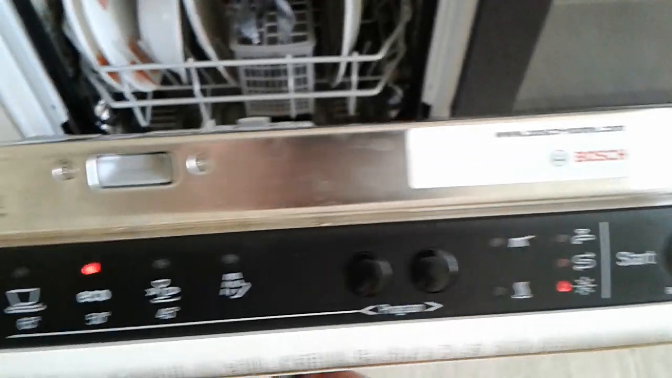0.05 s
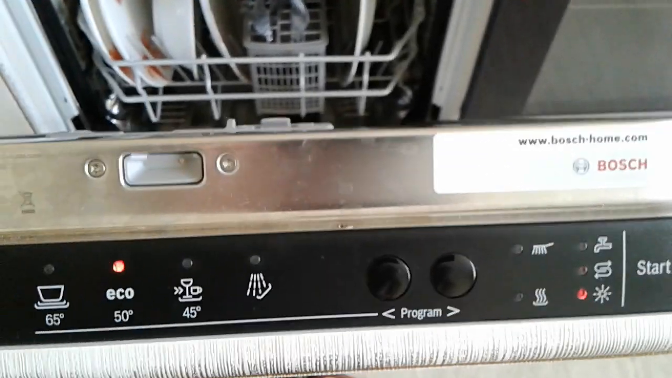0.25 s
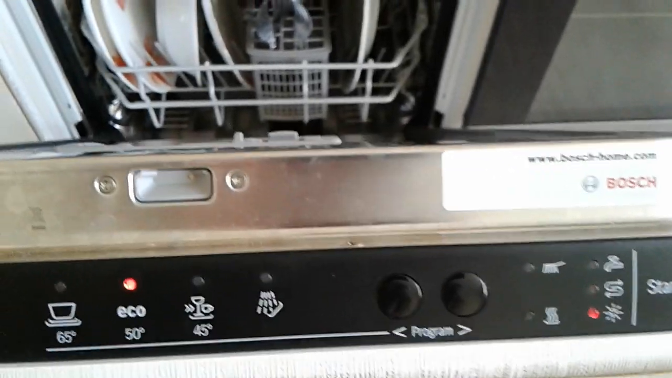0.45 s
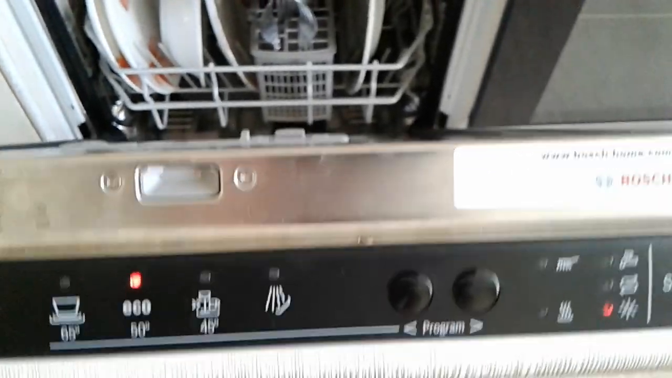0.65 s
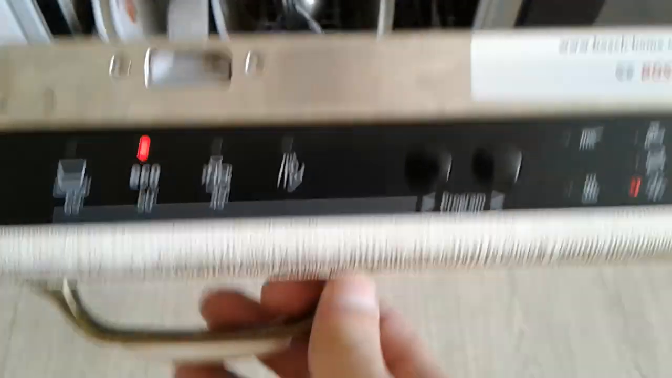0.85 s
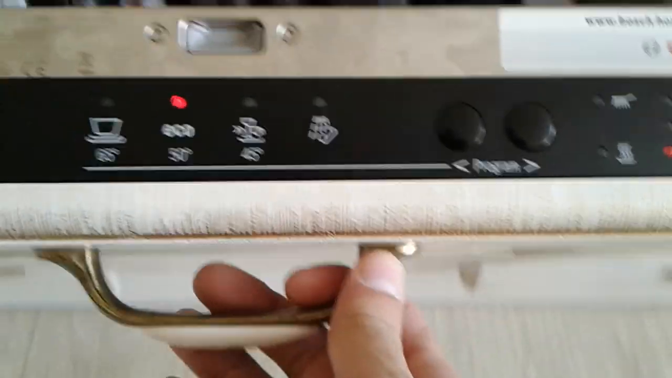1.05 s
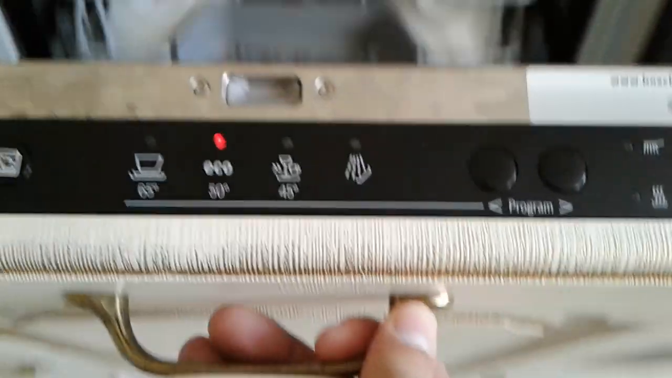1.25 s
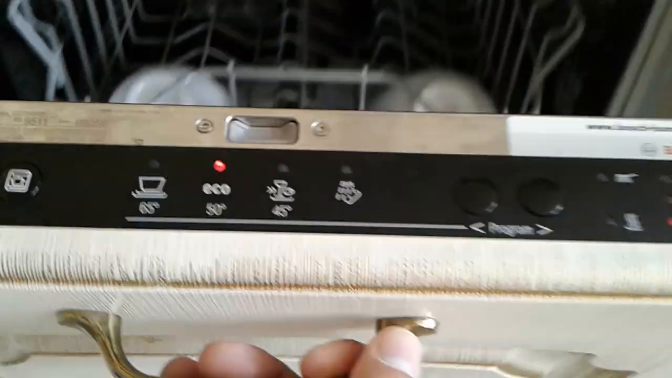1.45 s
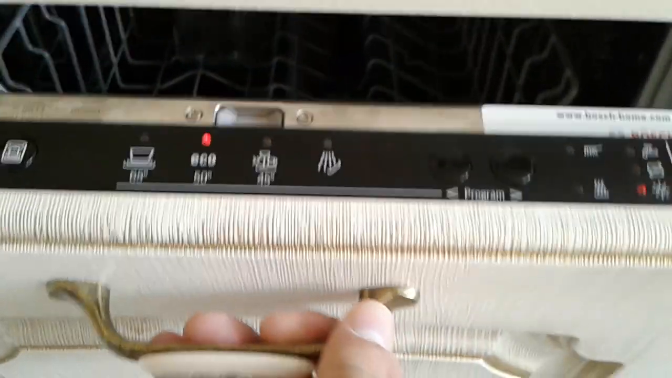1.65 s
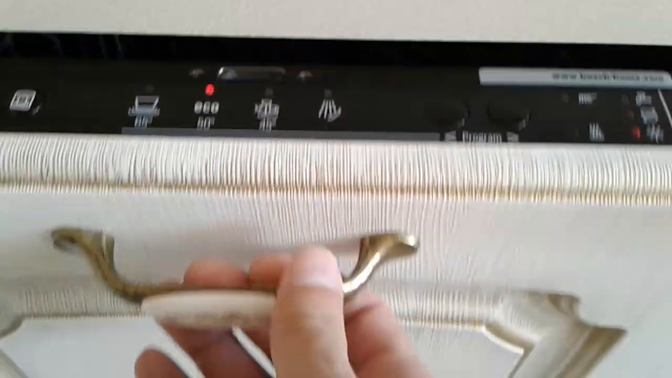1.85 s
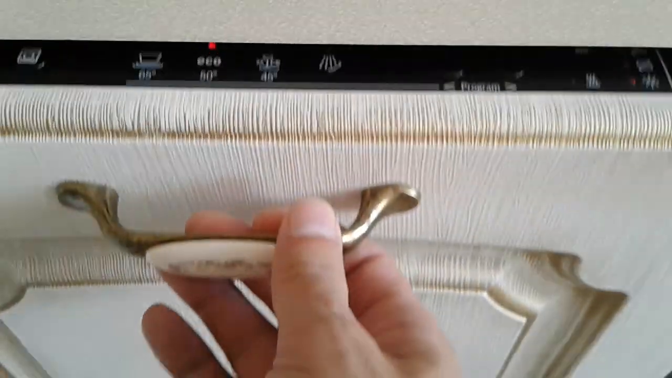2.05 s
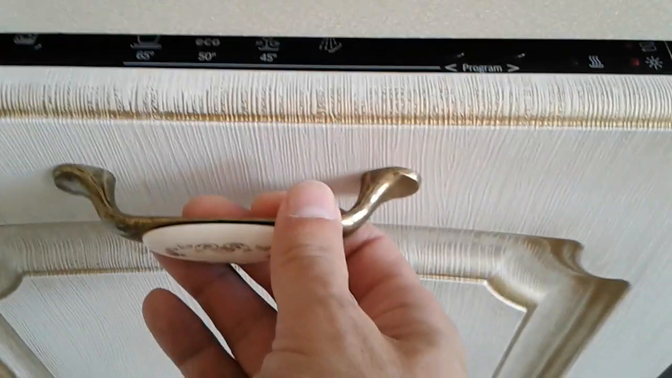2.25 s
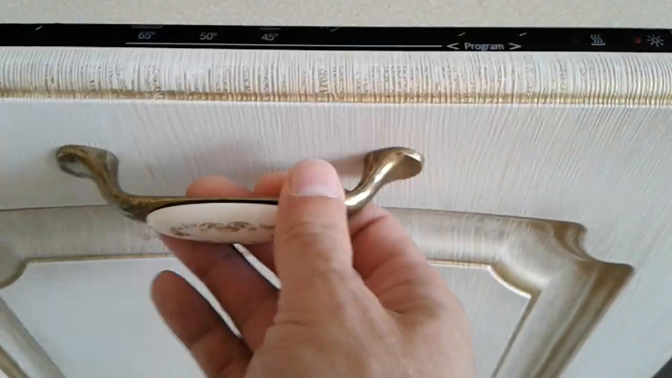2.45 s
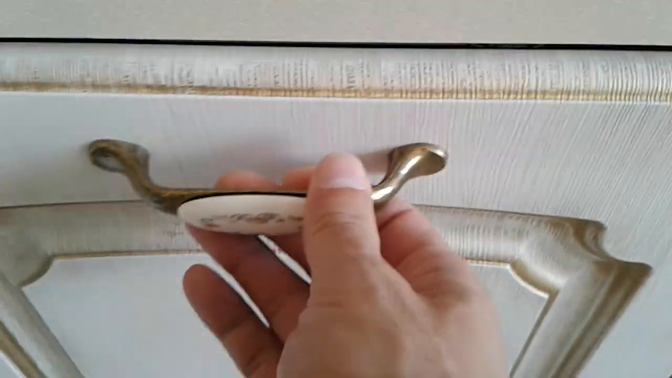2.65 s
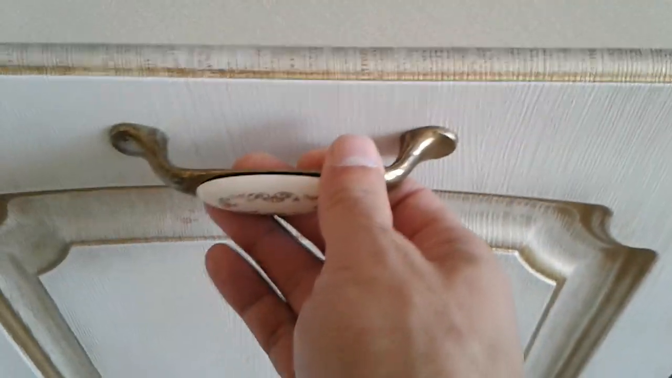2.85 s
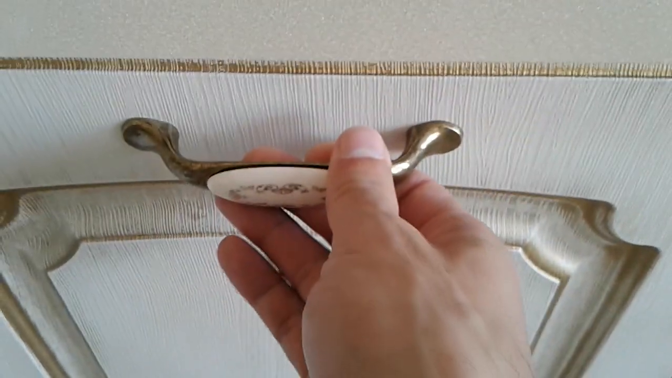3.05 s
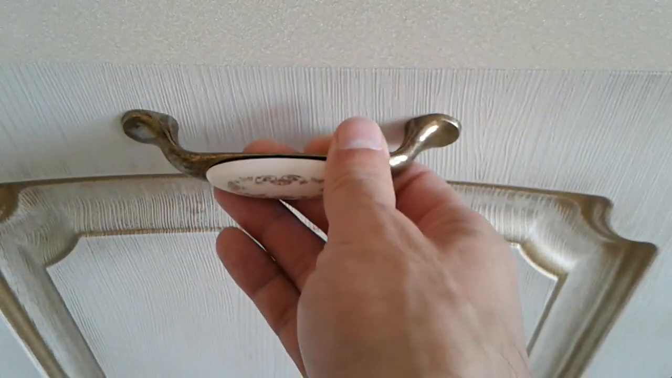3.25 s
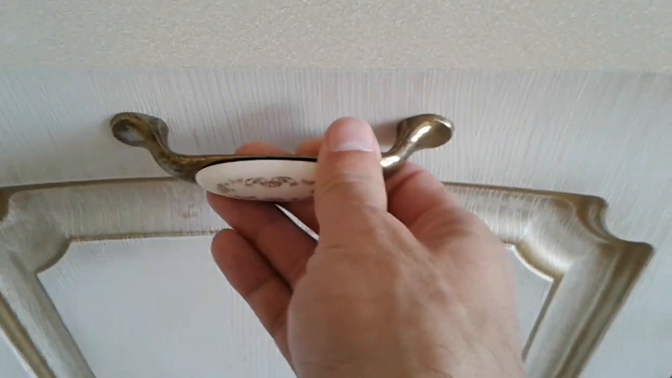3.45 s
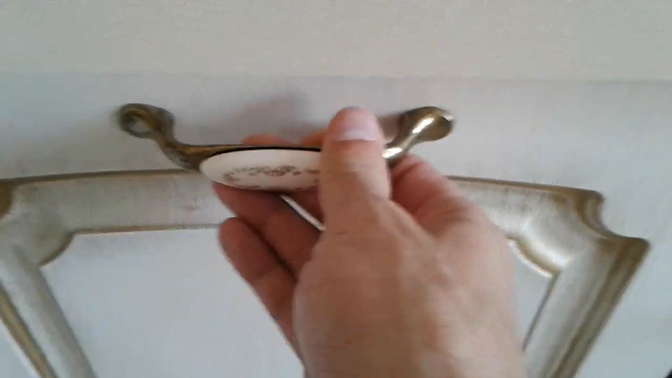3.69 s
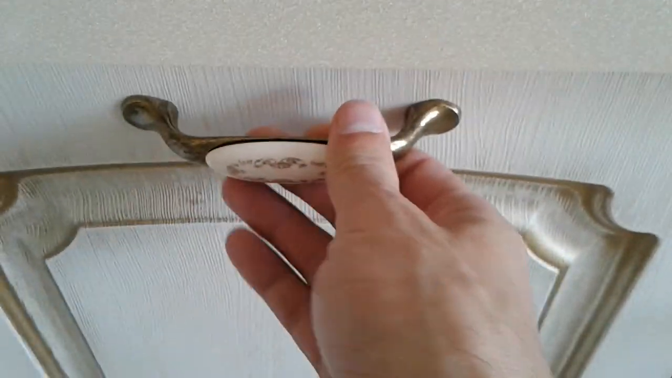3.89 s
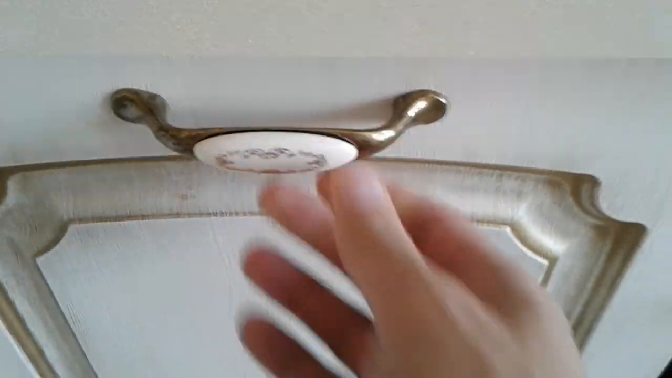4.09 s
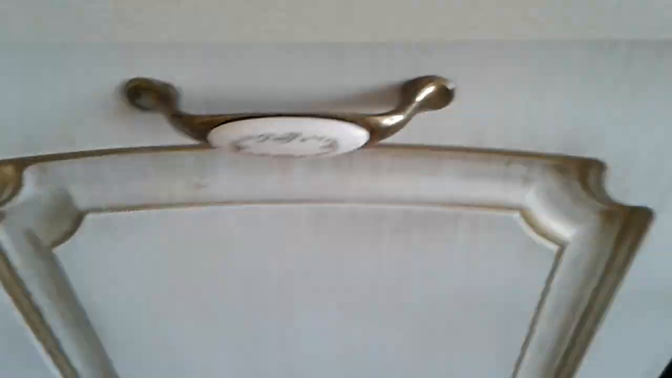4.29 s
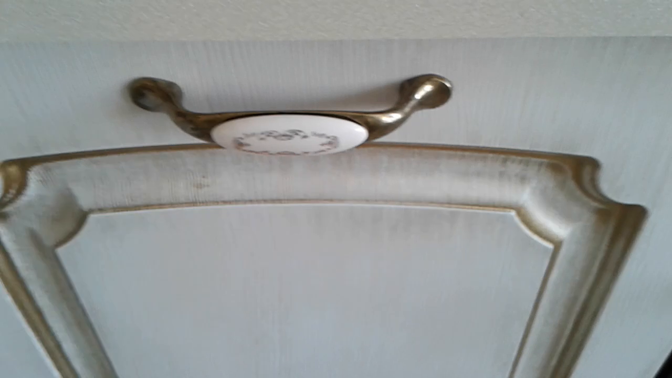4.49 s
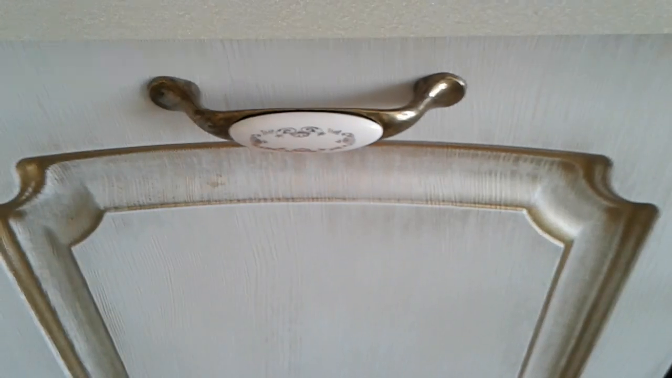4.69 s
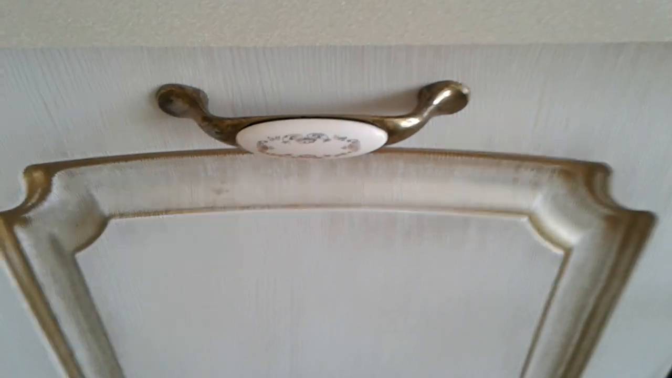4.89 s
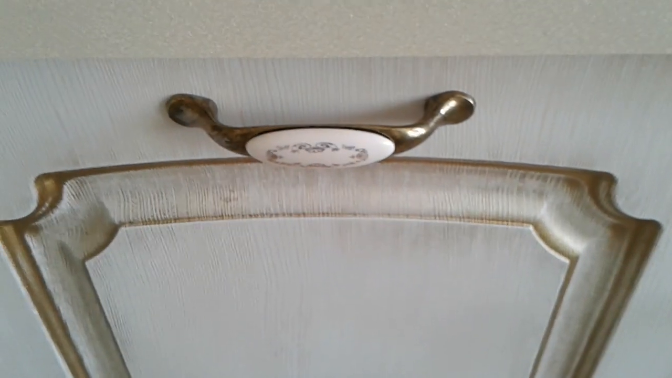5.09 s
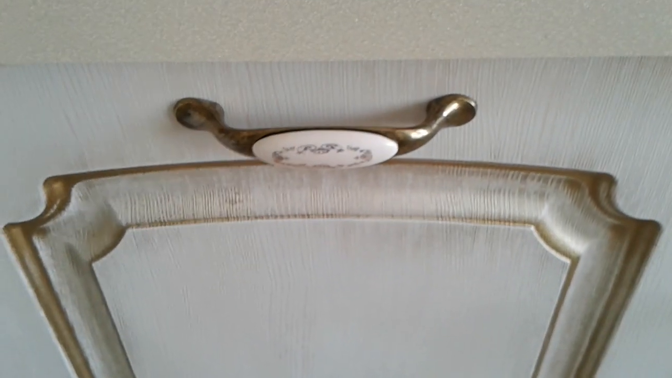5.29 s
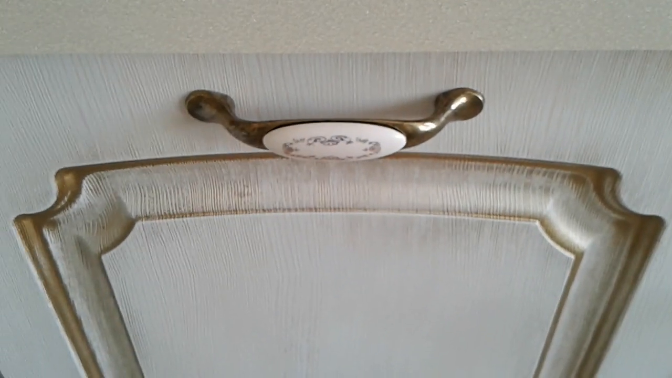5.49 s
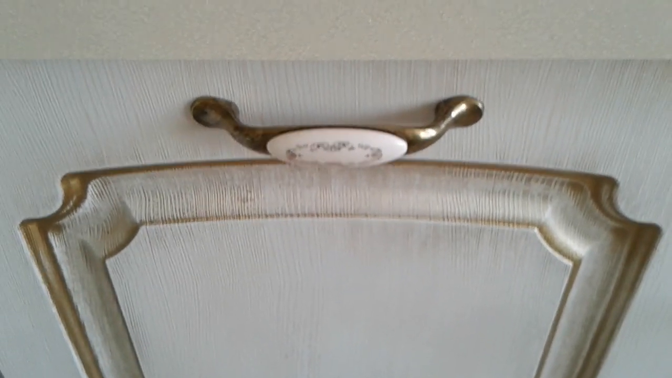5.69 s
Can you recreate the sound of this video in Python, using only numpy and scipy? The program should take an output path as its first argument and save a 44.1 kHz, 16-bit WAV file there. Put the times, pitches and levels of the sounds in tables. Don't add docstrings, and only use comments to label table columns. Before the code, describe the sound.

A dishwasher door is lifted with hollow panel knocks, catches softly, ticks at the latch, then slams loudly and leaves dishes clinking faintly.

```python
import sys
import numpy as np
from scipy import signal
from scipy.fft import rfft, irfft, next_fast_len
from scipy.io import wavfile
from scipy.ndimage import uniform_filter1d

SR = 44100
rng = np.random.default_rng(int(sys.argv[2]) if len(sys.argv) > 2 else 0)


def volts(x):
    e = np.asarray(x, float) / 20
    return 10 ** e


def master_out(mix):
    frames = np.transpose(np.atleast_2d(mix))
    ceiling = np.clip(frames, -1, 1)
    pcm = np.round(ceiling * 32767).astype(np.int16)
    wavfile.write(sys.argv[1], SR, pcm)


N = 252693
TIME = np.arange(N) / SR

# (time [s], peak level [dB], push length [ms])
SLAM_BLOWS = [(3.5877, 2.16, 0), (3.606, -10.5, .12), (3.6128, -13, .15), (3.619, -16, .12),
              (3.628, -9, .12), (3.635, -18.5, .12), (3.644, -20, .12), (3.657, -14.5, .15),
              (3.669, -18.5, .15), (3.675, -11.5, .15), (3.682, -39, .15)]
# (frequency [Hz], level [dB per Hz])
TUB_COLOUR = [(70, -39.5), (200, -21), (420, -17.5), (780, -17), (1100, -3.5), (1450, -8.5), (1900, -19.5),
              (3200, -25), (3700, -22), (4300, -31), (5200, -20), (6800, -32.5), (8600, -28), (10200, -33),
              (12000, -47), (15000, -41)]
# (frequency [Hz], level [dB], time to fade 60 dB [s])
TUB_TONES = [(305, -19.5, 0.57), (410, -20, 0.18), (521, -4, 0.12), (603, -24, 0.16), (926, -6.5, 0.12),
             (1005, -7, 0.19), (1023, 2.5, 0.93), (1417, 0, 0.15), (1593, -17.5, 0.13), (1790, -6, 0.044),
             (2170, -13, 0.5), (2300, -25.5, 0.4), (2310, -21.5, 0.37), (2780, -18, 1), (2730, -26, 0.43),
             (3050, -12, 0.29), (3470, -6.5, 0.17), (3960, -22.5, 0.7), (4170, -16.5, 0.21),
             (4443, -17, 0.12), (4160, -23.5, 0.22), (4750, -22, 0.31), (5260, -23.5, 0.41),
             (5720, -14, 0.44), (4847, -23, 0.38), (5000, -26, 0.36)]


def slam():
    return strike(SLAM_BLOWS, TUB_COLOUR, modes(TUB_TONES, shrink=0.41), ring_db=-25.5, wet_db=3.5,
                  build_s=0.012, spread_ms=0.29, crunch_hz=3000, crunch_ms=1.7, edge_db=1.5)


# (time [s], peak level [dB], push length [ms])
PANEL_KNOCKS = [
    (.668, -22, 0.28),
    (.6955, -17.5, 0.25),
    (.711, -43, 0.43),
    (.722, -38, 0.21),
    (.728, -33, 0.21),
    (.754, -37, 0.26),
    (.760, -32, 0.11),
]
# (frequency [Hz], level [dB per Hz])
PANEL_COLOUR = [(40, -56), (107, -13), (150, -17.5), (228, -5), (300, 0.5), (400, 2.5), (540, 0),
                (750, -11), (950, -16), (1250, -17.5), (2000, -31.5), (3200, -30), (4500, -44),
                (11000, -86)]
# (frequency [Hz], level [dB], time to fade 60 dB [s])
PANEL_TONES = [(110, -3, 0.41), (217, -1, 0.46), (308, -24, 0.23), (415.5, 10, 0.42), (460, -14, 0.21),
               (567, 5, 0.095), (640, 5.5, 0.093), (776, 3, 0.11)]


def panel_knock():
    return strike(PANEL_KNOCKS, PANEL_COLOUR, modes(PANEL_TONES, shrink=0.42), ring_db=-18, wet_db=-4.5,
                  build_s=0.014, spread_ms=1.24, crunch_hz=1200, crunch_ms=11.0, edge_db=1.0)


# (time [s], peak level [dB], push length [ms])
HINGE_CATCHES = [
    (2.192, -23.5, 0.67),
    (2.202, -42, 0.6),
    (2.208, -44, 0.26),
    (2.222, -31.5, 0.86),
    (2.249, -38, 0.35),
]
# (frequency [Hz], level [dB per Hz])
SEAL_COLOUR = [(24, -69), (40, -33), (58, -34), (169, -10), (263, -10.5), (329, 5), (401, -17), (668, -16),
               (730, -16), (1480, -9.5), (3220, -31), (8000, -50), (10400, -75), (17600, -120)]
# (frequency [Hz], level [dB], time to fade 60 dB [s])
SEAL_TONES = [(184, -15, 0.56), (325, -1, 0.19), (710, -25, 0.22), (960, -31, 0.43), (1370, -33, 0.68),
              (1310, -24, 0.3), (1520, -16, 0.26), (1776, -20, 1.0), (2000, -30, 0.49), (2083, -25, 0.26)]


def hinge_catch():
    return strike(HINGE_CATCHES, SEAL_COLOUR, modes(SEAL_TONES, shrink=0.93), ring_db=-24, wet_db=3.0,
                  build_s=0.012, spread_ms=0.59, crunch_hz=900, crunch_ms=5.5, edge_db=3.0)


# (frequency [Hz], level [dB per Hz])
TONGUE_COLOUR = [(35, -28), (60, -9.5), (156, -1.5), (305, 7), (721, -6), (792, -10), (1350, 5.5),
                 (2150, -9.5), (2780, -6), (3760, -15), (4520, -10.5), (7030, -18), (8470, -19),
                 (11500, -45), (15500, -35)]
# (time [s], peak level [dB])
LATCH_SNAPS = [
    (3.2897, -21.5),
    (3.2912, -33.5),
    (3.298, -43),
]


def latch_snap():
    return strike(LATCH_SNAPS, TONGUE_COLOUR, np.zeros(1), ring_db=0, wet_db=1.0,
                  build_s=0.00098, spread_ms=0.071, crunch_hz=3000, crunch_ms=0.69, edge_db=8.0)


def slips(count):
    start_s, length_s, push_ms = 2.1615, 0.034, 0.2
    level_db, swell_db, scatter_db = -33.5, 2, 4
    chance = rng.random((count, 2))
    late = 0.75 * chance[:, 0] * (np.arange(count) > 0)
    along = (np.arange(count) + late) / count
    db = level_db + swell_db * along + scatter_db * (2 * chance[:, 1] - 1)
    return np.c_[start_s + length_s * along, db, np.full(count, push_ms)].tolist()


# (frequency [Hz], level [dB per Hz])
RUBBER_COLOUR = [(88, -44), (150, 2), (540, 1), (753, 2.5), (890, -14), (1160, 4.5), (1390, -7.5),
                 (2540, -10.5), (4390, -25), (8000, -48), (10400, -75), (17600, -120)]


def seal_scrape():
    return strike(slips(count=16), RUBBER_COLOUR, np.zeros(1), ring_db=0, wet_db=-6.0,
                  build_s=0.0083, spread_ms=0.88, crunch_hz=1500, crunch_ms=5.2, edge_db=-4.5)


# (time [s], peak level [dB], frequency [Hz], time to fade 60 dB [s])
BLOW_BOOMS = [
    (0.689, -51, 110, 0.19),
    (.700, -67, 45, 1.7),
    (2.190, -53, 132, 0.18),
    (2.19, -32, 193, 0.11),
    (3.290, -48, 59.3, 0.18),
    (3.590, -37.5, 44, 0.5),
    (3.601, -36, 81, 0.48),
    (3.607, -22.5, 127, 0.072),
    (3.607, -14.5, 237, 0.054),
    (3.629, -31.5, 298, 0.36),
]
# (time [s], peak level [dB], frequency [Hz])
CABINET_ROCKS = [
    (1.153, -59, 89),
    (3.800, -53, 89),
    (3.951, -56, 161.3),
    (3.970, -54, 83.2),
    (4.152, -57, 76),
    (4.420, -62.5, 75.8),
    (4.681, -59.5, 166.3),
]


def boom():
    out = np.zeros(N)
    rocking_t60_s = 0.54
    rows = BLOW_BOOMS + [(*row, rocking_t60_s) for row in CABINET_ROCKS]
    phases = rng.uniform(0, 2 * np.pi, len(rows))
    for (s, db, hz, t60), phase in zip(rows, phases):
        swell = fade(0.036 * t60, t60)
        turn = 2 * np.pi * hz * np.arange(len(swell)) / SR
        tones = np.sin(turn) + 0.81 * np.sin(1.17 * turn + phase)
        add(out, s, volts(db) * swell * tones)
    return out


def short_fade(rise_s, t60_s):
    t = np.arange(4000) / SR
    return (1 - np.exp(-t / rise_s)) * volts(-60 * t / t60_s)


def tone_pair(hz, t60_s, rise_s):
    t = np.arange(4000) / SR
    tones = np.sin(2 * np.pi * hz * t) + 0.6 * np.sin(2 * np.pi * 0.82 * hz * t)
    return tones * short_fade(rise_s, t60_s)


def bright_edge(out, s, db, hz, t60_s):
    puff(out, s, db, short_fade(0.06 * t60_s, t60_s), rng.standard_normal(4000), hz, octaves=0.13)


# (time [s], peak level [dB], ring [Hz], edge level [dB])
LATCH_TICKS = [
    (2.907, -40.5, 1050, -85),
    (3.221, -50, 690, -85),
    (3.2551, -46, 950, -63),
    (3.267, -44, 740, -60.5),
    (3.278, -44, 900, -73),
]
# (time [s], peak level [dB], ring [Hz], edge level [dB])
DISH_CLINKS = [
    (4.038, -50, 1670, -73),
    (4.603, -53, 1053, -85),
    (4.629, -43, 1084, -60),
    (4.897, -38.5, 1087, -73),
    (4.95, -45.5, 1056, -78),
    (5.076, -56, 2530, -63),
    (5.10, -60, 2540, -73),
]


def ticks_and_clinks():
    dry = np.zeros(N)
    edge_hz, edge_t60_s = 8500, 0.028
    glaze_hz, glaze_t60_s = 4020, 0.052
    for s, db, hz, edge_db in LATCH_TICKS:
        add(dry, s, volts(db) * tone_pair(hz, t60_s=0.035, rise_s=0.0008))
        bright_edge(dry, s, edge_db, edge_hz, edge_t60_s)
    for s, db, hz, edge_db in DISH_CLINKS:
        ring = tone_pair(hz, t60_s=0.034, rise_s=0.005)
        overtone = volts(-13) * tone_pair(1.96 * hz, t60_s=0.034, rise_s=0.005)
        add(dry, s, volts(db) * (ring + overtone))
        bright_edge(dry, s, edge_db, glaze_hz, glaze_t60_s)
        bright_edge(dry, s, db - 24.5, edge_hz, glaze_t60_s)
    bright_edge(dry, 3.567, -59.5, 5600, edge_t60_s)
    return dry + volts(-6.0) * signal.fftconvolve(dry, room(0.0015))[:N]


# (time [s], level [dB], centre
# [Hz], width [octaves])
SOFT_BRUSHES = [(.700, -55, 2170, 0.62), (0.762, -61, 2700, 0.23), (1.050, -71, 7150, 0.42),
                (1.054, -66.5, 2870, 0.28), (1.435, -62.5, 5450, 1.2), (1.745, -66.5, 5600, 0.95),
                (2.190, -64, 5640, 0.84), (2.200, -61, 2000, 0.95), (3.215, -56.5, 900, 1.1),
                (3.31, -51, 1450, 0.14), (3.984, -76, 8500, 0.473), (4.031, -68, 2370, 0.53),
                (4.210, -72, 2600, .7), (4.455, -72.5, 4700, 1.6), (4.680, -58, 472, 0.57),
                (4.728, -60, 477, .5), (5.280, -64, 730, .2)]
# (time [s], level [dB], centre [Hz])
SHARP_SCUFFS = [
    (.755, -63, 5460),
    (3.255, -65, 3000),
    (4.629, -67.5, 2325),
    (4.838, -77.5, 6950),
    (4.896, -61.5, 2500),
]


def brushing():
    out = np.zeros(N)
    rows = [(*row, 0.0041, 0.048) for row in SOFT_BRUSHES]
    rows += [(*row, 1.27, 0.0011, 0.037) for row in SHARP_SCUFFS]
    size = SR // 2
    for s, db, hz, octaves, rise, fall in rows:
        grain = rng.standard_normal(size) * volts(1.5 * rng.exponential(size=size))
        puff(out, s, db, fade(rise, fall * np.log(1000))[:size], grain, hz, octaves)
    return out


# (time [s], frequency [Hz],
# level [dB])
WIRE_CHIRPS = [(0.959, 2510, -72), (1.06, 2830, -69), (2.261, 1200, -64), (2.44, 2330, -73),
               (2.62, 2270, -68), (2.76, 2740, -70.5), (3.95, 1970, -73), (4.101, 1975, -74),
               (4.21, 1960, -73), (4.21, 1418, -75), (4.33, 1960, -77), (4.451, 1983, -73),
               (4.449, 1400, -75), (4.761, 2200, -74), (4.91, 2110, -71), (4.97, 1090, -68),
               (5.141, 1083, -64.5), (5.27, 2400, -68)]


def wires():
    out = np.zeros(N)
    for s, hz, db in WIRE_CHIRPS:
        puff(out, s, db, fade(0.0079, 0.4), rng.standard_normal(SR), hz, octaves=0.07)
    return out


# (frequency [Hz], level [dB per Hz])
AIR_COLOUR = [(30, -25.5), (64, -16.5), (141, -5.5), (183, -11.5), (220, -3.5), (280, -3.5), (434, -7.5),
              (930, -15.5), (1530, -19.5), (2500, -21.5), (5000, -31.5), (8000, -31.5), (11000, -42),
              (15000, -36.5)]
# (frequency [Hz], level [dB rms])
FRIDGE_HUM = [(144, -70), (233, -72), (288, -67.5), (431, -71), (605, -77), (697, -79.5)]
# (frequency [Hz], level [dB rms])
ELECTRIC_WHINE = [(7150, -92.5), (8301, -99), (10000, -97)]


def kitchen():
    duck_db = -7.5 * np.interp(TIME, np.cumsum([3.884, 0.45, 0.28, 0.52]), [0, 1, 1, 0])
    swing_s, rise_s, fall_s = 0.65, 0.099, 0.35
    jolt = np.interp(TIME, np.cumsum([swing_s, rise_s, fall_s]), [0, 1, 0])
    roll = np.interp(TIME, np.cumsum([swing_s, rise_s + fall_s, 0.4, 2.01 - 1.5]), [0, 1, 1, 0])
    low_gain = volts(12.5 * jolt + 3.5 * roll + 1.08 * duck_db)
    mid_gain = volts(-2 + 3.5 * roll + 0.34 * duck_db)
    top_gain = volts(1.6 + duck_db)
    fridge_gain = volts(duck_db + np.interp(TIME, [swing_s, 1.5], [-7.5, 0]))

    air = shape(rng.standard_normal(N), lambda f: gain_at(f, AIR_COLOUR) - 40 * (f > 15750))
    low = signal.sosfiltfilt(signal.butter(1, 800, fs=SR, output="sos"), air)
    top = signal.sosfiltfilt(signal.butter(1, 4500, "high", fs=SR, output="sos"), air)
    mid = air - low - top
    noise = volts(-60.5) * (low_gain * low + mid_gain * mid + top_gain * top) / np.std(air)
    hum = sum(volts(db) * wavering(hz, 5, steady=3.0) for hz, db in FRIDGE_HUM)
    whine = sum(volts(db) * wavering(hz, 120, steady=1.3) for hz, db in ELECTRIC_WHINE)
    return noise + fridge_gain * hum + whine


def wavering(hz, width_hz, steady):
    wide = int(SR / width_hz)
    drift = rng.standard_normal((2, N))
    re, im = uniform_filter1d(uniform_filter1d(drift, wide), wide)
    turn = 2 * np.pi * hz * TIME
    return unit((steady * np.std(re) + re) * np.cos(turn) + im * np.sin(turn))


def strike(rows, table, ring, ring_db, wet_db, build_s, spread_ms, crunch_hz, crunch_ms, edge_db):
    hits, out = np.zeros(SR // 4), np.zeros(N)
    first_s = rows[0][0]
    for s, db, *push_ms in rows:
        length_ms = push_ms[0] if push_ms else 0
        push = np.hanning(int(SR * length_ms / 1000) + 3)[1:-1]
        add(hits, s - first_s, volts(db) * push / push.sum())
    short = body(lambda f: gain_at(f, table), spread_ms)
    short = short / np.abs(short).max()
    answer = volts(wet_db) * signal.fftconvolve(short, room(build_s))
    deep = signal.sosfilt(signal.butter(1, crunch_hz, fs=SR, output="sos"), short)
    crunch = rng.standard_normal(len(short)) * np.exp(-np.arange(len(short)) / (crunch_ms * SR / 1000))
    crunch = crunch / np.linalg.norm(crunch)
    add(answer, 0, deep)
    add(answer, 0, volts(edge_db) * signal.fftconvolve(short - deep, crunch))
    add(answer, 0, volts(ring_db) * ring)
    add(out, first_s, signal.fftconvolve(hits, answer))
    return out


def modes(table, shrink, size=30000):
    t = np.arange(size) / SR
    out = np.zeros(size)
    for (hz, db, t60), phase in zip(table, rng.uniform(0, 2 * np.pi, len(table))):
        fall_db = 60 * t / (shrink * min(t60, 0.6))
        out += volts(db - fall_db) * np.sin(2 * np.pi * hz * t + phase)
    return (1 - np.exp(-t / 0.0015)) * out


def body(db_of, spread_ms=0., size=4096):
    hz = np.fft.rfftfreq(size, 1 / SR)
    cep = irfft(np.log(volts(db_of(hz))), size)
    cep[1:size // 2] *= 2
    cep[size // 2 + 1:] = 0
    paths = np.c_[np.geomspace(100, 20000, num=24), rng.random(24)]
    late_s = spread_ms / 1000 * gain_at(hz, paths)
    turn = 2 * np.pi * np.cumsum(late_s) * SR / size
    return irfft(np.exp(rfft(cep) - 1j * turn), size)[:size // 2]


# (frequency [Hz], time to fade 60 dB [s])
ROOM_FADE = [(100, 1), (250, .4), (1000, 0.31), (3000, 0.39), (8000, 0.36), (11000, .35), (15000, 0.23)]


def room(build_s, size=40000):
    t, out = np.arange(size) / SR, np.zeros(size)
    for hz in 60 * 2. ** np.arange(9):
        band = shape(rng.standard_normal(size), lambda f: bell(f, hz, 0.7))
        out += band * volts(-60 * t / gain_at(hz, ROOM_FADE))
    return out * (1 - np.exp(-(t / build_s) ** 2)) / np.sqrt(np.sum(out ** 2))


def gain_at(hz, table):
    f, db = np.transpose(table)[:2]
    return np.interp(np.log(np.maximum(hz, 1)), np.log(f), db)


def shape(x, db_of):
    size = next_fast_len(len(x))
    return irfft(rfft(x, size) * volts(db_of(np.fft.rfftfreq(size, 1 / SR))), size)[:len(x)]


def unit(x):
    return x / np.sqrt(np.mean(x ** 2))


def bell(hz, centre_hz, octaves):
    return -12 * (np.log2(np.maximum(hz, 1) / centre_hz) / octaves) ** 2


def fade(rise, t60):
    t = np.arange(int(1.2 * t60 * SR) + 4000) / SR
    return (1 - np.exp(-t / rise)) * volts(-60 * t / t60)


def add(out, s, sound):
    at = int(s * SR)
    out[at:at + len(sound)] += sound[:len(out) - at]


def puff(out, s, db, envelope, noise, hz, octaves):
    band = unit(shape(noise, lambda f: bell(f, hz, octaves)))
    add(out, s, volts(db) * envelope * band[:len(envelope)])


def scene():
    door = slam() + panel_knock() + hinge_catch() + latch_snap() + seal_scrape()
    return (door + boom() + ticks_and_clinks() + brushing() + wires() + kitchen())[None]


# (frequency [Hz], width [Hz], level [dB])
PORT_PEAKS = [(4080, 100, 0.5), (4900, 410, 3), (6500, 380, -0.5), (8700, 700, 3.5), (11800, 4200, -2.5),
              (15000, 900, 3.5)]


def phone_port(dry):
    port = body(lambda f: sum(db * np.exp(-((f - hz) / width_hz) ** 2) for hz, width_hz, db in PORT_PEAKS))
    return signal.fftconvolve(dry, port[None, :512])[:, :N]


def band_limit(x):
    return signal.sosfilt(signal.butter(12, 16780, fs=SR, output="sos"), x)


def record(dry):
    heard = np.tanh(0.8 * phone_port(dry)) / 0.8
    heard = signal.sosfilt(signal.ellip(10, 0.2, 80, 15900, fs=SR, output="sos"), heard)
    return band_limit(heard - 0.0004)


dry = scene()
out = record(dry)
master_out(out)
```